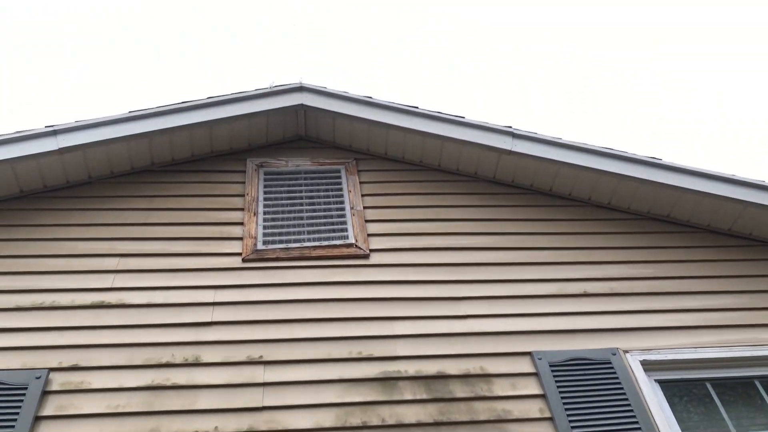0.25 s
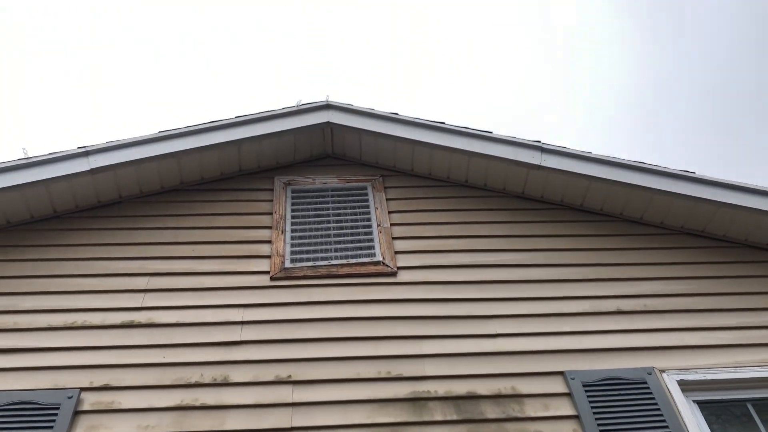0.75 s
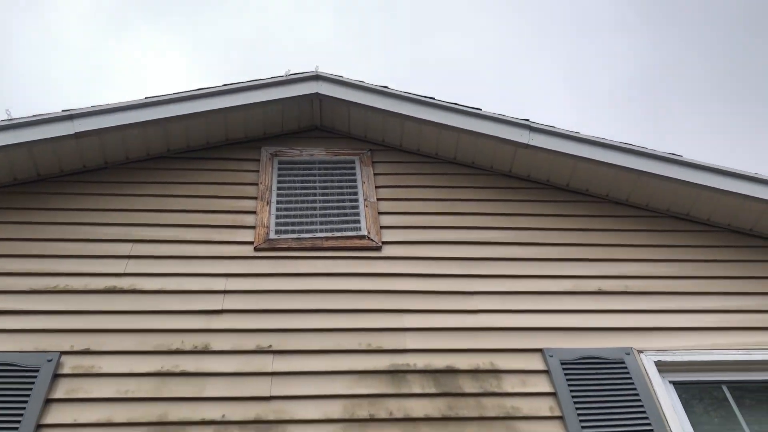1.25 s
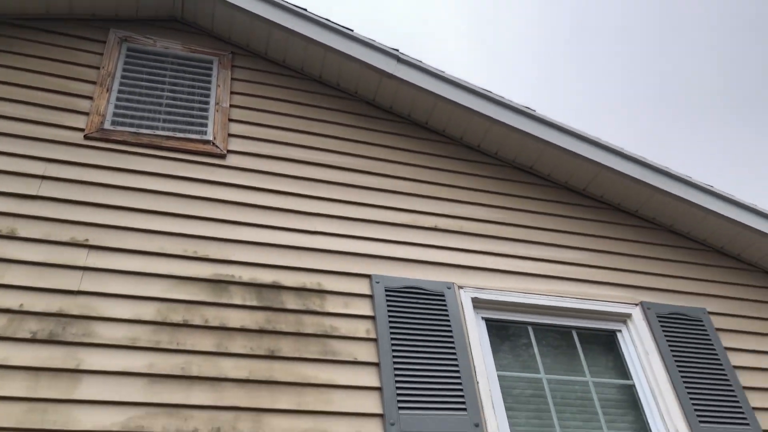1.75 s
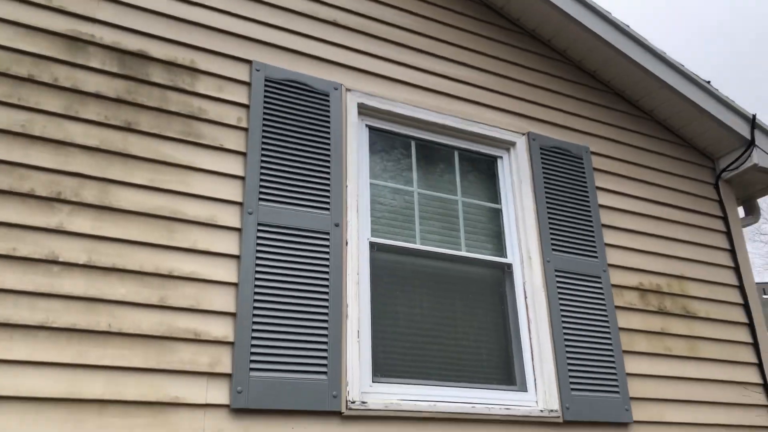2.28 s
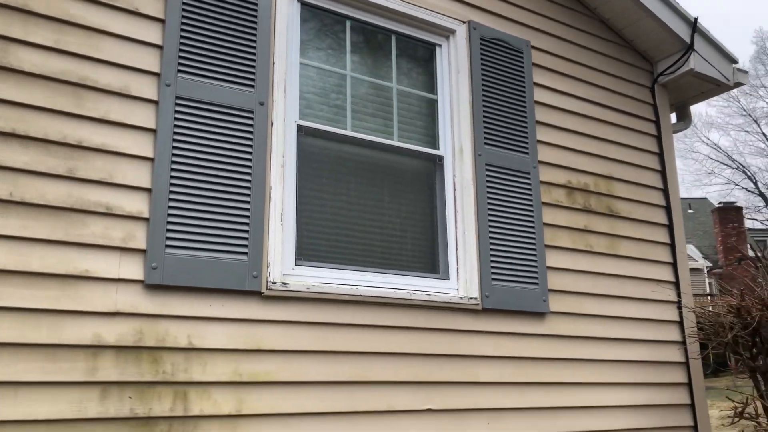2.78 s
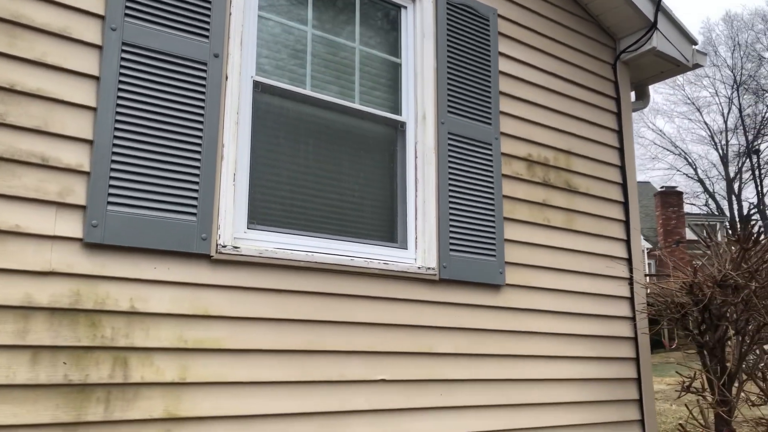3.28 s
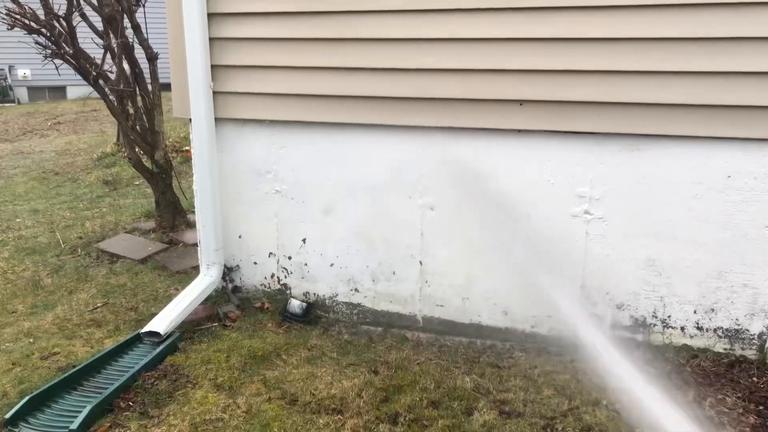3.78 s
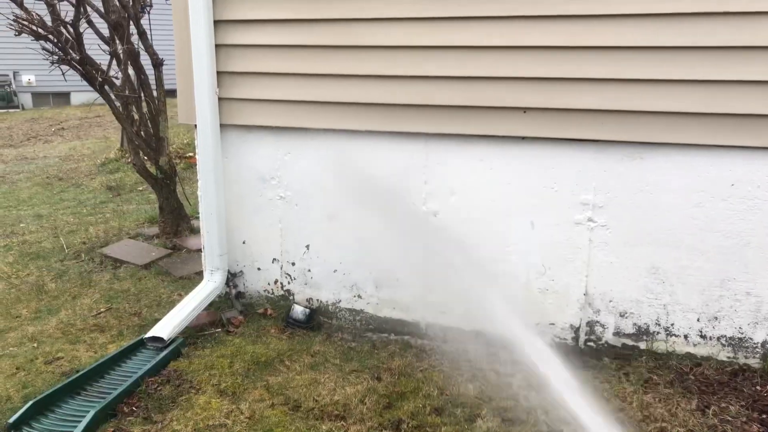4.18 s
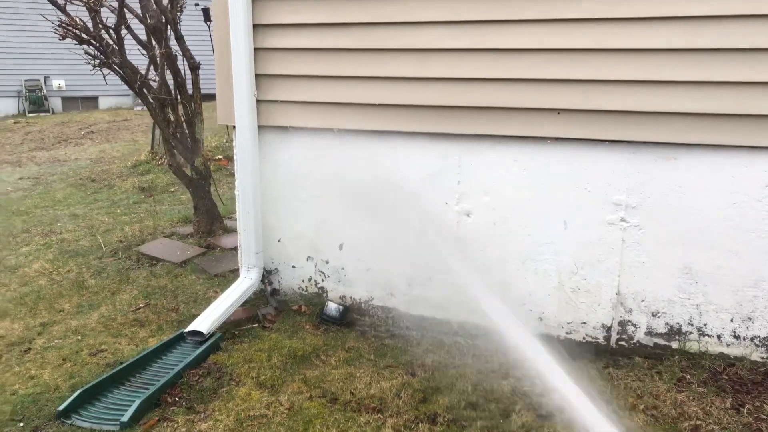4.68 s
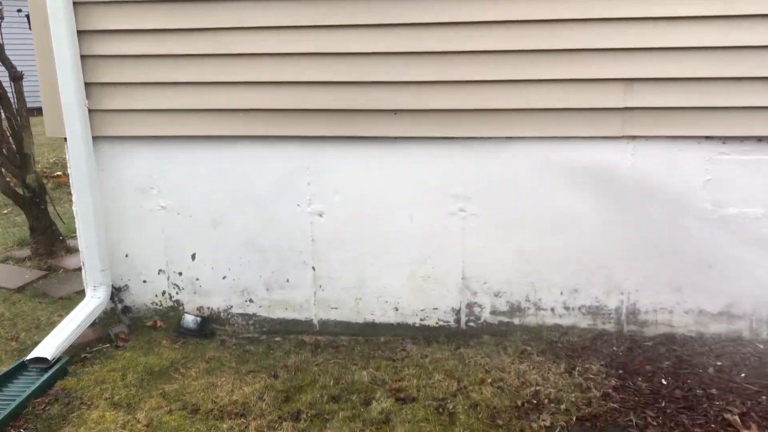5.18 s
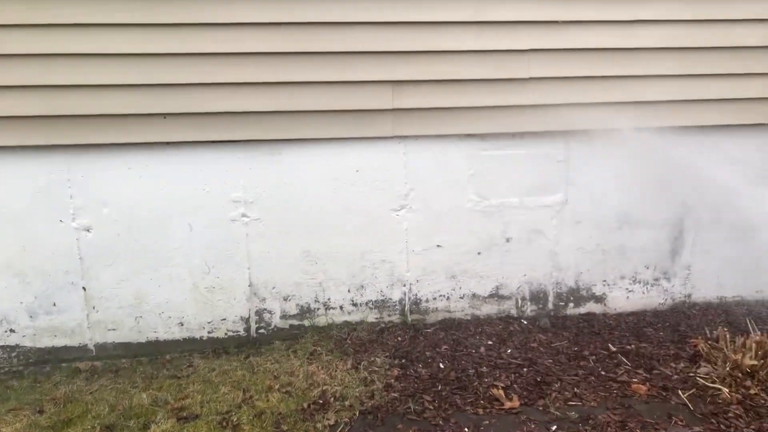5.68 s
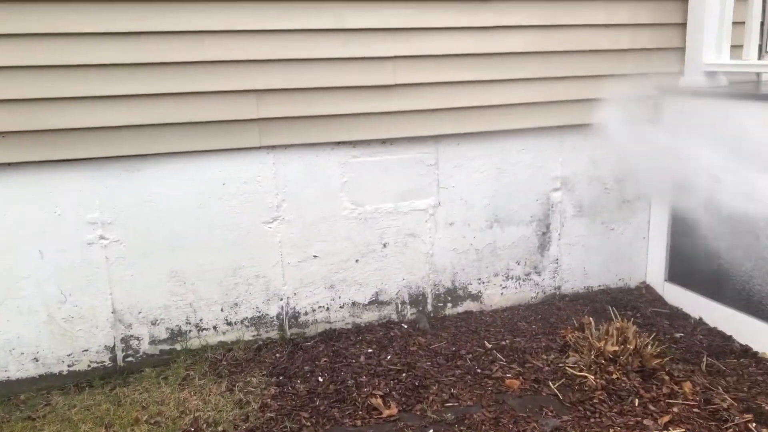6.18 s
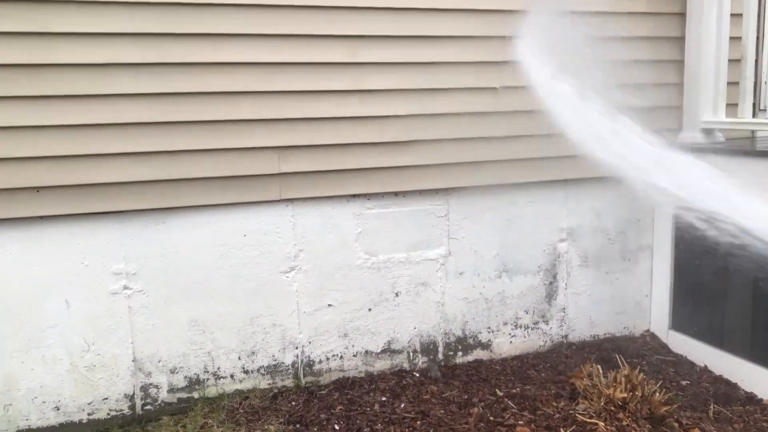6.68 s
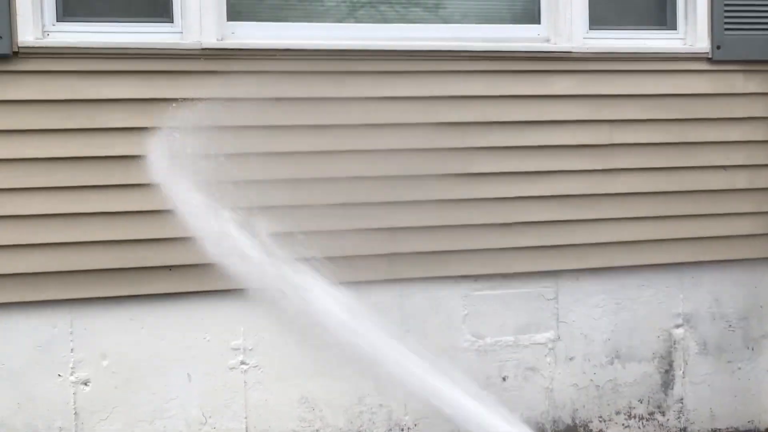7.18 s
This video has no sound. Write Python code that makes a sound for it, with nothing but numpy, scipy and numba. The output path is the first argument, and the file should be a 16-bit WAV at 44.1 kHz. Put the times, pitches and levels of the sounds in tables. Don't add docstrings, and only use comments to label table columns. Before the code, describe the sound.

Outdoors beside a house, a small petrol engine idles some distance off with a soft, dull yard hiss, while drips and fine ticks in wet grass fall near a handheld phone. Halfway through, the scene cuts to a loud pressure washer jet hissing on a wall, with a whistling, airy nozzle and brief swishes over the steady loaded engine.

```python
import sys
import numpy as np
from scipy import signal
from scipy.fft import rfft, irfft, next_fast_len
from scipy.io import wavfile
from scipy.ndimage import uniform_filter1d, map_coordinates
from numba import njit

SR = 44100
rng = np.random.default_rng(int(sys.argv[2]) if len(sys.argv) > 2 else 0)


def wav_record(signal):
    frames = np.transpose(np.atleast_2d(signal))
    bounded = np.clip(frames, -1, 1)
    quanta = np.round(bounded * 32767).astype(np.int16)
    wavfile.write(sys.argv[1], SR, quanta)


def volts_from_db(level):
    exponent = np.asarray(level, float) / 20
    return 10 ** exponent


N = 328104

CUT_S, FADE_S = 3.487, 0.023
# t/s, jet level/dB, aim (extra treble when the jet faces the phone)/dB, nozzle nearness/dB
LANCE_SWEEP = [(3.52, -20, -5, -27), (3.72, -20, -5, -30.5), (3.85, -19, -4, -29.5),
               (4.1, -18.5, -4.5, -25.5), (4.27, -18.5, -4.5, -30.5), (4.42, -18, -4, -25),
               (4.68, -18, -3, -25.5), (5.08, -22, -4.5, -27), (5.4, -20.5, -3.5, -27),
               (6.0, -23, -4.5, -28.5), (6.28, -21, -2.5, -28.5), (6.42, -20.5, -4.5, -19.5),
               (6.64, -22, -5.5, -26.5), (6.83, -16, -3.5, -21.5), (7.02, -19.5, -5.5, -26),
               (7.18, -17, -4.5, -21), (7.36, -18, -4, -26), (7.44, -16.5, -6, -22)]
# f/Hz, level/dB per Hz
SPRAY_COLOUR = [(35, -21), (80, -1), (200, 0.5), (330, -2), (600, 1), (1200, 0), (1700, -1), (2500, 1),
                (4000, -1.5), (6000, -0.5), (8000, 0), (11000, 0), (13300, -0.5), (15500, -0.5)]
# f/Hz, mean level/dB per kHz, dB per jet dB, dB per aim dB
SPRAY_LAYERS = [
    (1000, -33, 0.3, -0.4),
    (3940, -33, 0.97, -1.5),
    (8000, -30, 0.85, -.3),
    (13000, -30, 1.13, 0.4),
]
# mean level/dB, dB per jet dB, dB per nearness dB, slow wander/dB
TUBE_LEVELS = [
    (-27, 0.92, 0.63, 0.2),
    (-31.5, 2.1, -0.04, 1.6),
    (-32.5, 1.74, 0.4, 2.2),
    (-40, 0, 1.5, .4),
]
# f/Hz, shift/Hz per nearness dB, wander/Hz
TUBE_LOW = [
    (2492, 12, 10),
    (6410, -3, 60),
]
# t/s, length/s, start f/Hz, end f/Hz, level/dB
SWISHES = [
    (4.2, 0.1, 3580, 4940, -28),
    (4.23, 0.068, 6150, 5560, -26),
    (4.267, 0.09, 5430, 6100, -20),
    (6.02, 0.088, 5700, 5500, -35),
    (6.08, 0.22, 8400, 7400, -34),
    (6.172, 0.25, 5140, 4100, -30.5),
    (6.278, 0.16, 6700, 5570, -29.5),
    (6.905, 0.16, 5200, 4180, -30),
    (6.97, 0.073, 6000, 5900, -25),
]
# t/s, firing rate f/Hz, exhaust swell level/dB
LOAD_RUN = [
    (3.5, 30.11, -1),
    (4.2, 30.11, -.5),
    (4.9, 30.04, 0),
    (5.2, 30.12, 0),
    (6, 30.1, 0),
    (7.44, 30.06, 0),
]
# t/s, firing rate f/Hz, exhaust swell level/dB
IDLE_RUN = [
    (0, 32.23, 0),
    (.6, 32.2, .5),
    (1.1, 32.4, .5),
    (1.6, 32.25, .5),
    (2, 32.47, .5),
    (2.5, 32.4, 0),
    (3.1, 32.2, -.5),
    (3.5, 32.15, -.5),
]
# multiple of the firing rate, level/dB
LOAD_ORDERS = [(1, -32), (2, -0.5), (3, -1), (4, -9), (5, 0), (6, -10), (8, -14), (9, -16), (11, -23),
               (12, -18.5), (25, -36), (26, -12), (27, -27)]
IDLE_ORDERS = [(1, -27), (2, -0.5), (3, -4), (4, -6), (5, -22), (6, -10), (7, -45), (8, -15.5), (9, -12.5),
               (13, -56), (16, -21), (72, -27)]
# f/Hz, level/dB per Hz
YARD_COLOUR = [(35, -12), (80, 4.5), (200, 3), (330, 1.5), (520, 3.5), (1000, 1.5), (1500, -1.5),
               (2500, -9.5), (4500, -16.5), (5800, -23), (7300, -26), (9000, -32.5), (13500, -42),
               (15200, -38.5)]
# t/s, level/dB, brightness/dB
PHONE_TURN = [
    (0, -49.5, -8),
    (.5, -49, -9),
    (1, -49, -9),
    (1.5, -49, -9),
    (2, -48.5, -8),
    (2.5, -50, -6),
    (3, -50.5, -5.5),
    (3.5, -50, -6.5),
]
# t/s, peak level/dB, centre f/Hz, band width/share of the centre
PLOPS = [(.1, -50, 6000, .1), (.51, -48, 3350, .05), (.94, -49, 3330, .05), (.97, -50, 3400, .05),
         (1.3, -51, 3350, .08), (1.529, -48, 4380, .14), (1.593, -46, 4900, 0.3), (2.04, -47, 6000, .2),
         (2.373, -40.5, 4860, .14), (2.619, -43, 5600, .25), (2.652, -43, 3810, .2),
         (2.915, -41, 4300, .35), (2.917, -47, 6200, .2), (3.069, -44, 5800, .2)]
# t/s, peak level/dB, centre f/Hz
DRIPS = [(0.0862, -50, 7200), (0.2209, -51, 6510), (0.2563, -52, 6860), (0.4489, -47, 8470),
         (0.6799, -47, 6700), (0.9053, -52, 6910), (1.0685, -50, 6670), (1.512, -52, 9300),
         (1.5653, -52, 7870), (1.6297, -50, 7130), (1.6467, -41, 7600), (1.8986, -49, 9760),
         (1.928, -45, 7380), (2.0403, -40, 8100), (2.1969, -48, 8390), (2.4723, -52, 9190),
         (2.5232, -52, 6690), (2.5496, -51, 7770), (2.6379, -52, 7090), (2.6738, -50, 7920),
         (2.806, -50, 8170), (2.9223, -41, 7350), (2.9572, -43, 7790), (3.0315, -52, 8000),
         (3.0684, -40, 9410), (3.2191, -48, 6620), (3.2854, -50, 6750), (3.3293, -54, 7140),
         (3.3418, -45.5, 9060), (3.4471, -50, 6530)]
# t/s, peak level/dB, centre f/Hz
GRASS_TICKS = [(0.1784, -49, 11300), (0.2867, -57, 14800), (0.4194, -56, 11900), (0.5955, -48, 12800),
               (0.6275, -50, 11300), (0.6794, -50, 15200), (0.6998, -51, 15000), (1.0146, -55, 15300),
               (1.2082, -56, 10800), (1.3219, -48, 11100), (1.4636, -53, 15600), (1.6467, -55, 13700),
               (1.7584, -50, 13900), (1.8986, -52, 10800), (1.94, -40, 15300), (2.0403, -41, 14500),
               (2.2293, -43, 13100), (2.2558, -48, 13300), (2.3166, -47, 11200), (2.5232, -49, 11600),
               (2.5501, -43, 11000), (2.806, -52, 12600), (2.9148, -51, 14900), (2.9796, -54, 15200),
               (3.0689, -45, 10600), (3.0974, -46, 15200), (3.1088, -45, 12400), (3.1906, -56, 11700),
               (3.2186, -52, 11400), (3.2535, -50, 15100)]


def curves(table):
    s, *columns = np.transpose(table)
    return [np.interp(np.arange(N) / SR, s, column) for column in columns]


def unit(x):
    return x / np.sqrt(np.mean(x ** 2))


def walk(rate):
    hold = int(SR / rate)
    steps = np.repeat(rng.standard_normal(N // hold + 1), hold)[:N]
    return unit(uniform_filter1d(uniform_filter1d(steps, hold), hold))


@njit
def svf(x, hz, width):
    y, band, low = np.empty(len(x)), 0., 0.
    for i in range(len(x)):
        g, damping = np.tan(np.pi * hz[i] / SR), width / hz[i]
        v = (band + g * (x[i] - low)) / (1 + g * (g + damping))
        band, low, y[i] = 2 * v - band, low + 2 * g * v, damping * v
    return y


def hiss(colour, anchors_hz, anchors_db, flicker_db, rate):
    size = next_fast_len(N)
    octave = np.log2(np.maximum(np.arange(size // 2 + 1) * SR / size, 1))
    hz, db = np.transpose(colour)
    noise = rfft(rng.standard_normal(size)) * volts_from_db(np.interp(octave, np.log2(hz), db))
    out = np.zeros(N)
    for centre in np.arange(5, 14.3, 1 / 3):
        band = irfft(noise * np.clip(1 - 3 * abs(octave - centre), 0, 1), size)[:N]
        place = np.interp(centre, np.log2(anchors_hz), np.arange(len(anchors_hz)))
        low = min(int(place), len(anchors_hz) - 2)
        level_db = anchors_db[low] + (place - low) * (anchors_db[low + 1] - anchors_db[low])
        out += band * volts_from_db(level_db + flicker_db * walk(rate))
    return out


def spraying():
    jet = splash() + nozzle() + swishes()
    flutter = volts_from_db(0.32 * walk(60))
    exhaust, _ = engine(LOAD_RUN, LOAD_ORDERS, lag=.32, odd_lead=-1.5, wobble_db=.3)
    return flutter * jet + volts_from_db(-28.5) * exhaust + pump()


def lance():
    jet_db, aim_db, near_db = curves(LANCE_SWEEP)
    return jet_db + 20, aim_db + 4, near_db + 26


def splash():
    jet_db, aim_db, _ = lance()
    layers_db = [db + force * jet_db + aim * aim_db for _, db, force, aim in SPRAY_LAYERS]
    siding_s, siding_db = 6.38, 1
    layers_db[0] = layers_db[0] + siding_db * np.tanh((np.arange(N) / SR - siding_s) / 0.086)
    anchors_hz = [row[0] for row in SPRAY_LAYERS]
    water = volts_from_db(13) * hiss(SPRAY_COLOUR, anchors_hz, layers_db, flicker_db=1.0, rate=9)
    return lance_echo(water, 6.975, .055, from_ms=.12, to_ms=.175, share=.45)


def lance_echo(x, s, length, from_ms, to_ms, share):
    t = np.arange(N) / SR
    lag = np.interp(t, [s, s + length], [from_ms, to_ms]) * SR / 1000
    near = share * np.exp(-((t - s - length / 2) / (length / 2)) ** 4)
    echo = map_coordinates(x, [np.clip(np.arange(N) - lag, 0, N - 1)], order=3)
    return (x + near * echo) / np.sqrt(1 + near ** 2)


def nozzle():
    jet_db, _, near_db = lance()
    low = [hz + per_db * near_db + wander_hz * walk(8) for hz, per_db, wander_hz in TUBE_LOW]
    top = [hz * (1 + 0.0082 * walk(5.7)) for hz in (9830, 14700)]
    widths_hz = [260, 540, 750, 750]
    out = np.zeros(N)
    for hz, width, (db, force, near, wander_db) in zip(low + top, widths_hz, TUBE_LEVELS):
        hz = hz + 0.06 * width * walk(20)
        ring = svf(svf(rng.standard_normal(N), hz, 1.53 * width), hz, 1.53 * width)
        level_db = db + force * jet_db + near * near_db
        waver_db = wander_db * np.tanh(walk(9)) + 0.43 * walk(30)
        out += unit(ring) * volts_from_db(level_db + waver_db)
    return out


def swishes():
    out = np.zeros(N)
    for s, length, from_hz, to_hz, db in SWISHES:
        width = 600 + .3 * abs(to_hz - from_hz)
        hz = np.linspace(from_hz, to_hz, int(length * SR))
        noise = rng.standard_normal(len(hz))
        band = svf(svf(noise, hz, 1.1 * width), hz, 1.1 * width)
        start = int(s * SR)
        out[start:start + len(hz)] += volts_from_db(db) * unit(band) * np.hanning(len(hz))
    return out


def engine(table, orders, lag, odd_lead, wobble_db):
    hz, db = curves(table)
    phase = 2 * np.pi * np.cumsum(hz) / SR
    tone = np.zeros(N)
    for k, order_db in orders:
        level = volts_from_db(order_db + wobble_db * np.sqrt(min(k, 9)) * walk(3.97))
        tone += level * np.cos(k * phase + lag * k * k + odd_lead * (k % 2))
    return -unit(tone) * volts_from_db(db), phase


def pump():
    pump_hz, pump_db = 173, -43
    hum = np.sqrt(2) * np.sin(2 * np.pi * pump_hz * np.arange(N) / SR)
    return volts_from_db(pump_db + walk(3.35)) * hum


def idling():
    exhaust, phase = engine(IDLE_RUN, IDLE_ORDERS, lag=.0, odd_lead=1.0, wobble_db=0.5)
    return volts_from_db(-36.0) * exhaust + fan(phase) + dripping()


def fan(phase):
    body_db, bright_db = curves(PHONE_TURN)
    levels_db = [body_db + 16.5, body_db + bright_db + 24.5]
    air = hiss(YARD_COLOUR, [900, 3500], levels_db, flicker_db=0.67, rate=8.67)
    return air * volts_from_db(0.3 * np.cos(2 * phase))


def dripping():
    drips = ticks(np.c_[DRIPS, [0.18] * len(DRIPS)], 0.0014)
    grass = ticks(np.c_[GRASS_TICKS, [0.68] * len(GRASS_TICKS)], .0016)
    return ticks(PLOPS, 0.00354) + drips + grass + patter(count=300)


def ticks(events, decay_s):
    out, t = np.zeros(N + 512), np.arange(512) / SR
    for s, db, hz, share in events:
        width = hz * np.clip(share, .05, 1.5)
        fall = np.exp(-t / decay_s) + 0.22 * np.exp(-t / 0.0057)
        centre = hz + 0 * t
        puff = svf(svf(rng.standard_normal(512) * fall, centre, width), centre, 2 * width)
        start = int(s * SR)
        out[start:start + 512] += volts_from_db(db) * puff / abs(puff).max()
    return out[:N]


def patter(count):
    s, size, pitch = rng.random((count, 3)).T
    peak_db = -65 + 4.5 * s - 2.1 * np.log(size)
    return ticks(np.c_[s ** .8 * CUT_S, peak_db, 8000 + 7000 * pitch, .7 + 0 * s], .0015)


def scene():
    fade = np.clip((np.arange(N) / SR - CUT_S) / FADE_S, 0, 1)
    return np.tile((1 - fade) * idling() + fade * spraying(), (2, 1))


def band_limit(x):
    return signal.sosfilt(signal.butter(12, 17060, fs=SR, output="sos"), x)


def record(dry):
    top_hz, slope_hz = 15820, 80
    size = next_fast_len(N + SR // 10)
    hz = np.arange(size // 2 + 1) * SR / size
    keep = np.clip((top_hz - hz) / slope_hz, 0, 1) ** 2
    mix = irfft(rfft(dry, size) * keep, size)[:, :N]
    return band_limit(mix)


dry = scene()
out = record(dry)
wav_record(out)
```